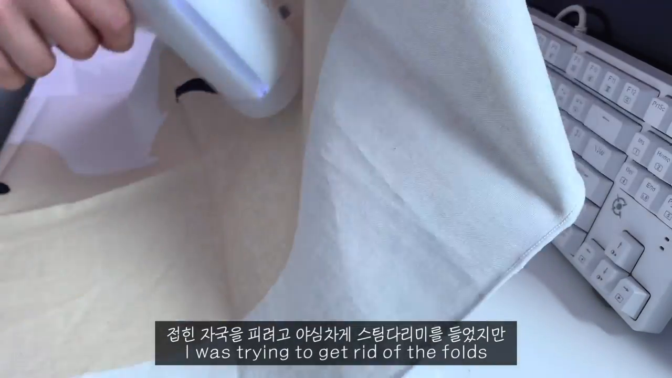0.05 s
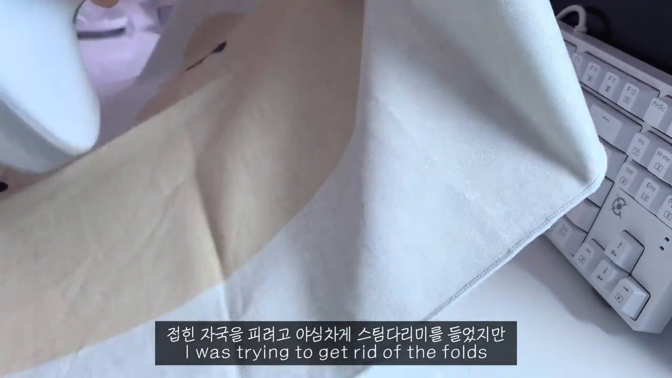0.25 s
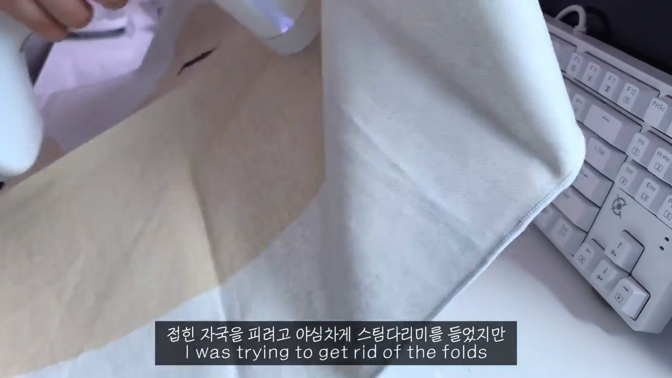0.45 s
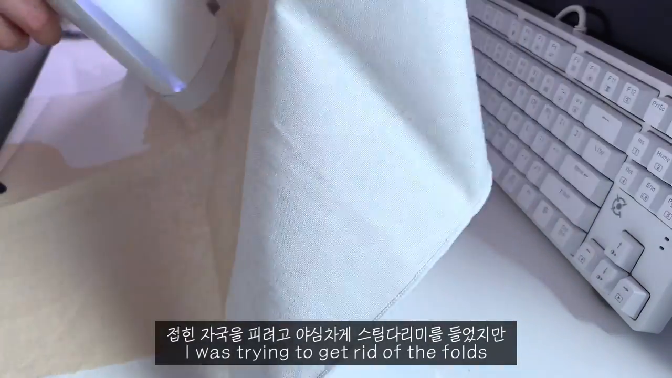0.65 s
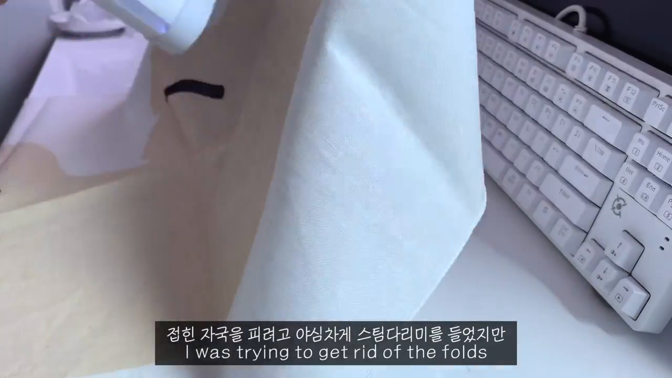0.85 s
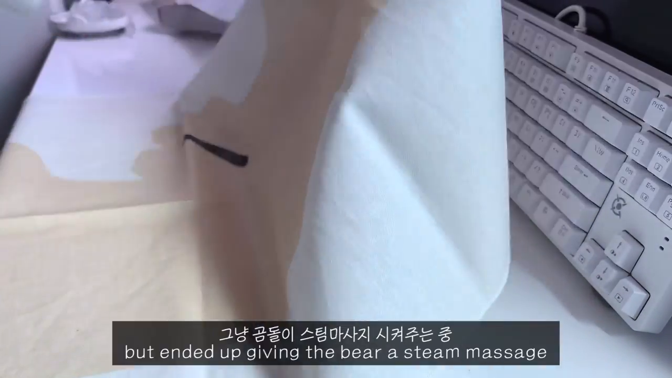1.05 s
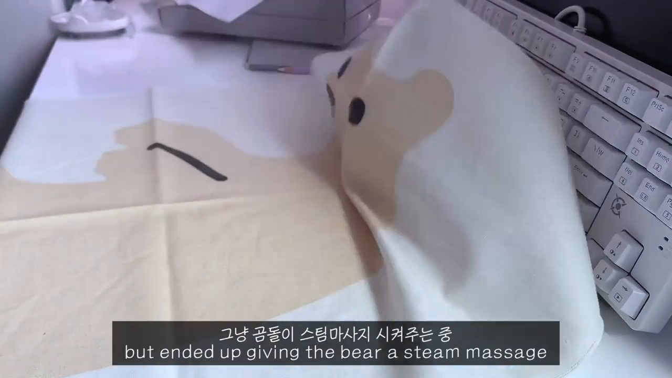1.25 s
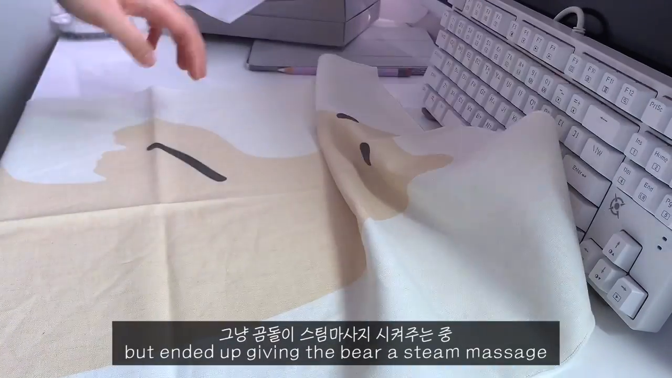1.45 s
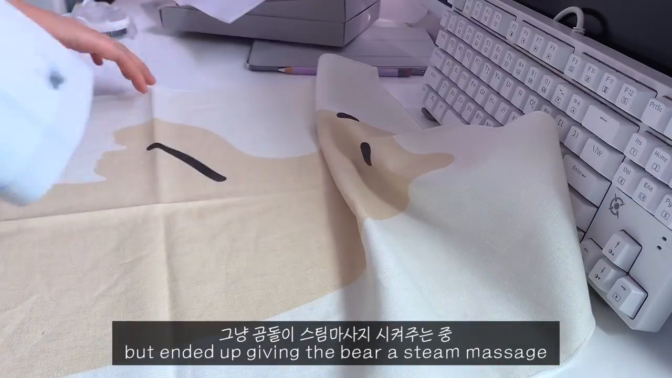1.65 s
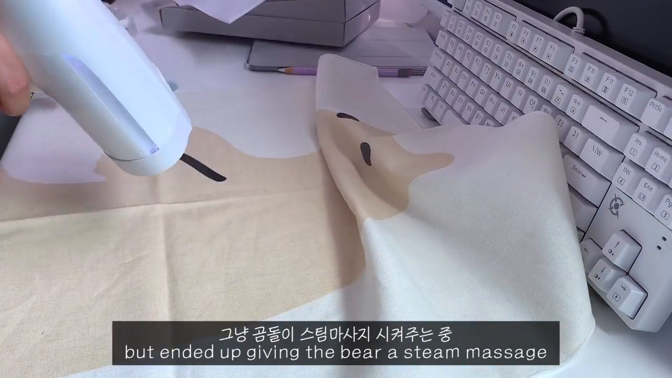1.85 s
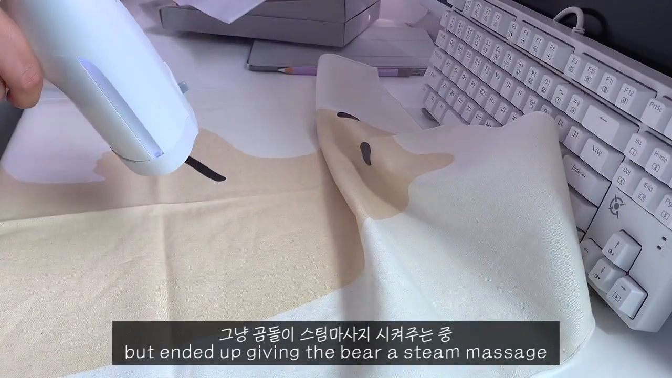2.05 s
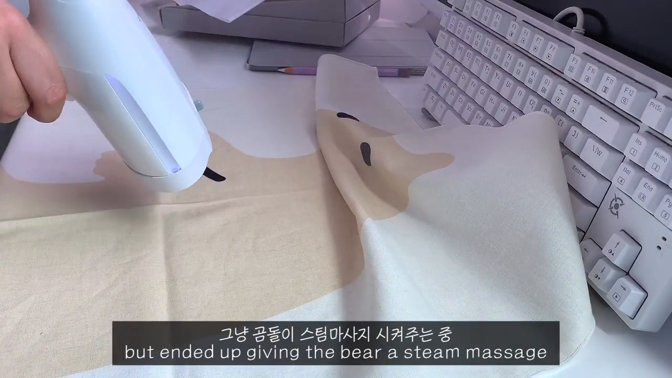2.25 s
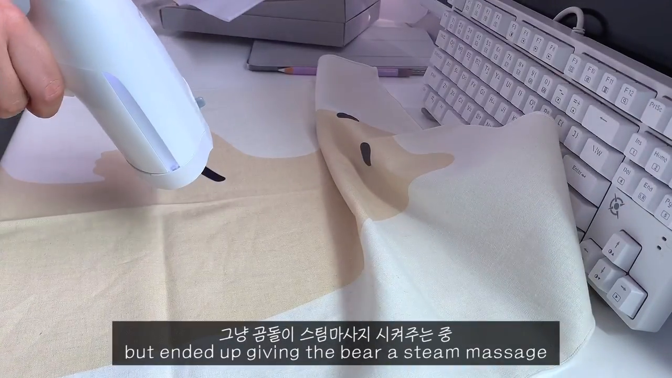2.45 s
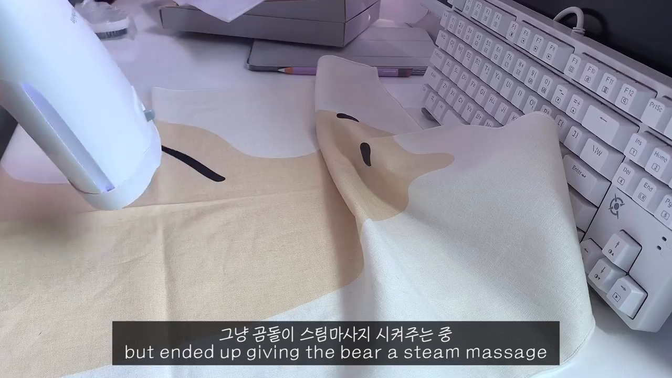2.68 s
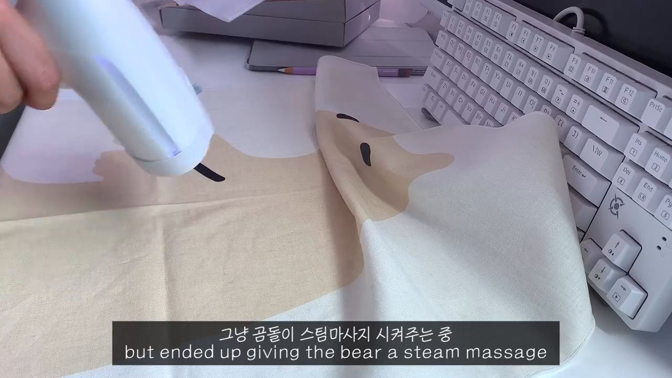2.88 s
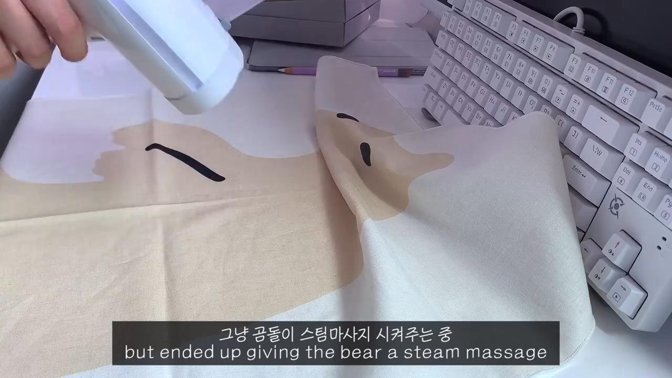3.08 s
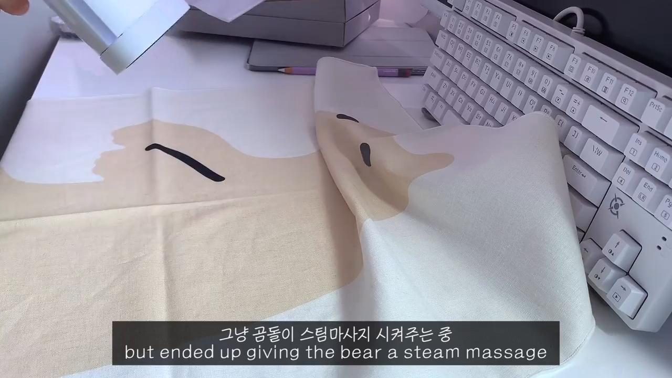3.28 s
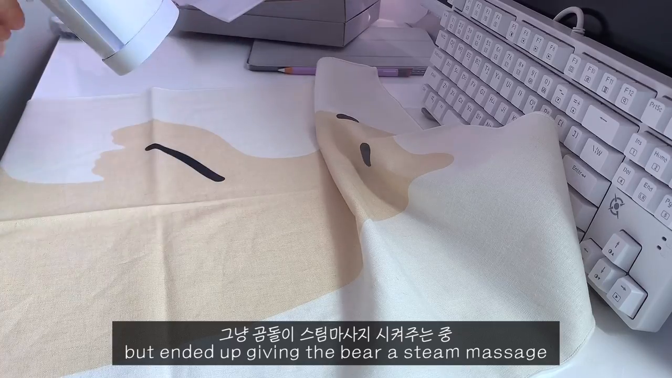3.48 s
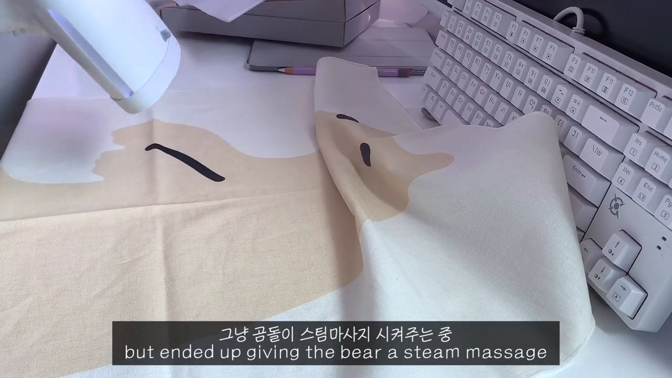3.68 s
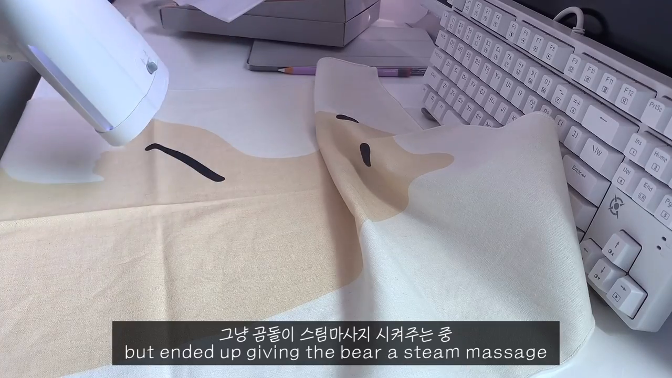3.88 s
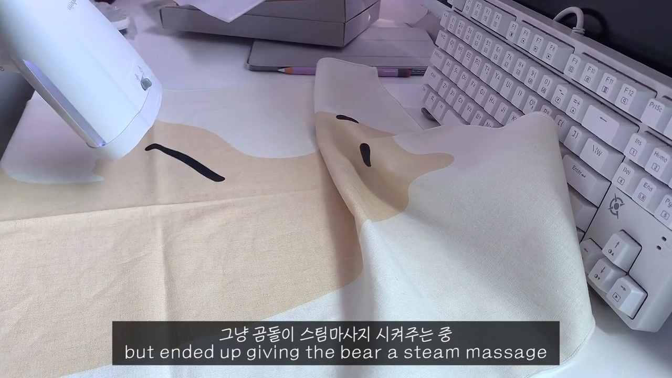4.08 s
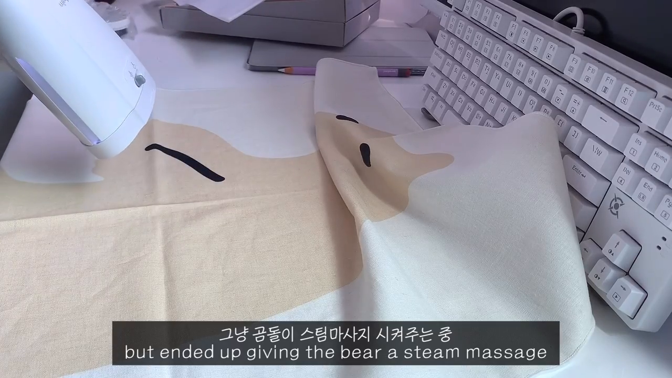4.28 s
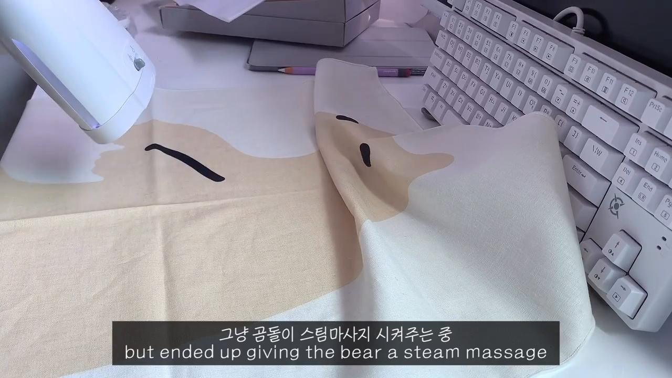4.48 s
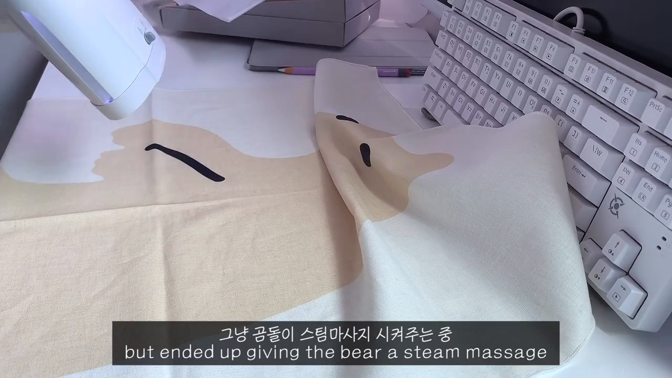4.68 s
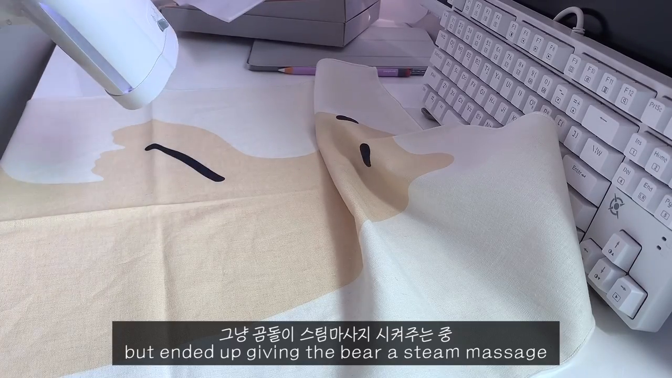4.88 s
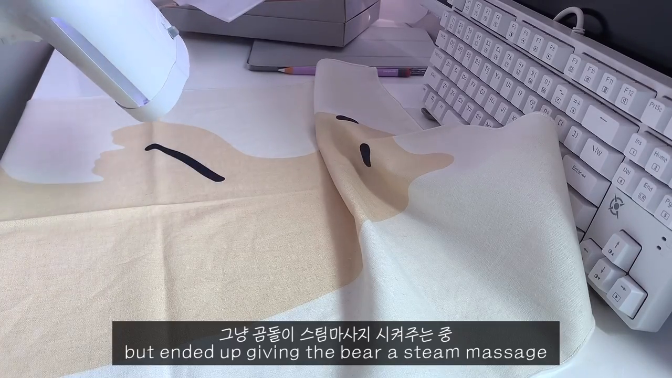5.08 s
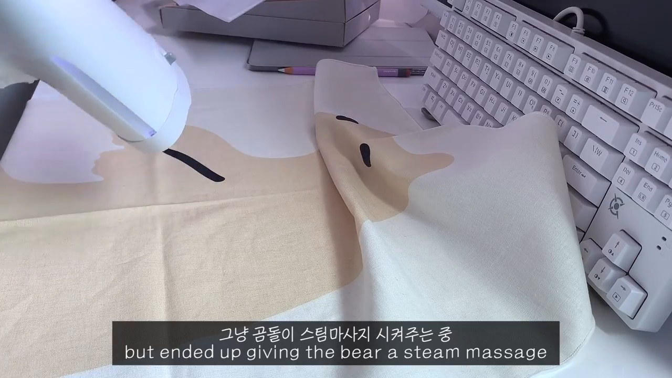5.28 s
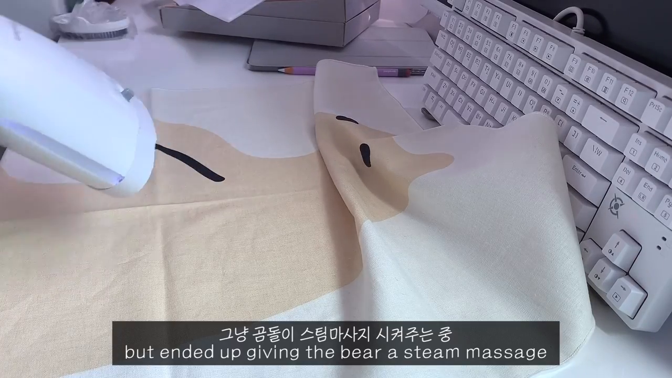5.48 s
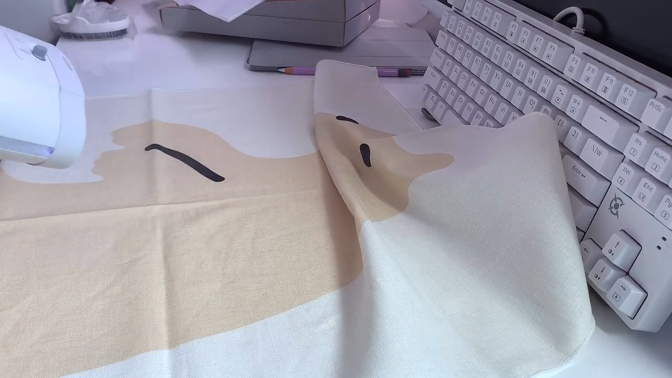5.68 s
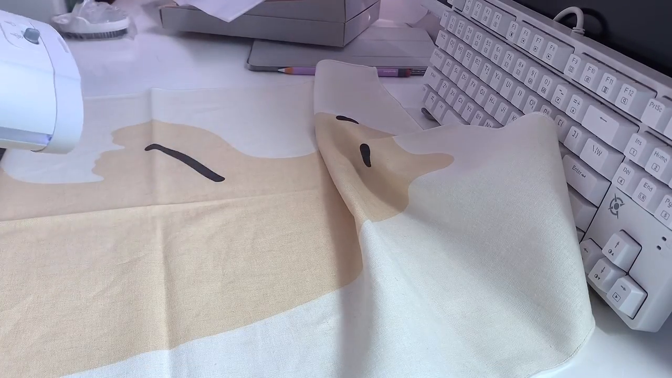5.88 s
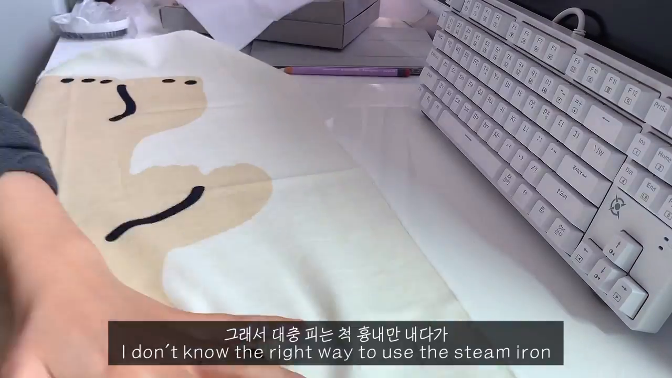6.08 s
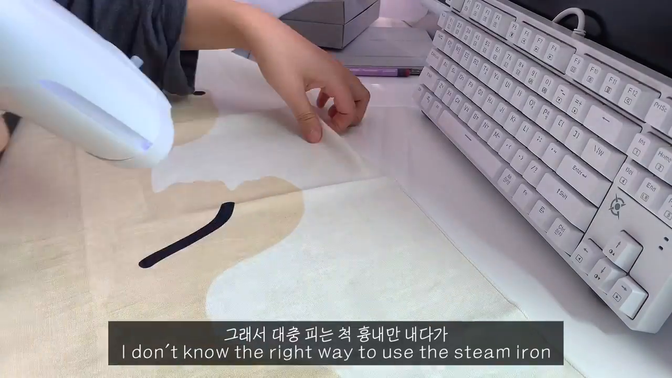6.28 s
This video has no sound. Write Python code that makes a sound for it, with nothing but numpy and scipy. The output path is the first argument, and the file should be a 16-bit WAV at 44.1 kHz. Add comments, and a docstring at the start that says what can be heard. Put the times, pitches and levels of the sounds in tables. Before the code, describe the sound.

Close up at a desk, a handheld steamer simmers and spits over a low wavering hum. A thin hiss swells, then a bright steam jet opens and blows on cloth, rising and falling with a moving, hollow comb-like colour. It stops dead near the end, leaving quiet room air and soft finger taps. Close stereo microphones, small room.

```python
"""Simmering, spitting water and a wavering hum come first, then a thin hiss swells and a steam jet opens. It is
a handheld garment steamer, worked over a cloth on a desk close to a pair of microphones. The jet is coloured
noise, combed by moving echoes off the desk; the same combs shape a softer rush on the cloth. Boiling is low
noise, the pump a few harmonics over a drone, and spits, bumps and taps are damped modes. The scene then changes
at once to the quiet room and a hand tapping the cloth."""
import sys
import numpy as np
from scipy import signal
from scipy.fft import rfft, irfft
from scipy.io import wavfile
from scipy.ndimage import uniform_filter1d

SR = 44100
rng = np.random.default_rng(int(sys.argv[2]) if len(sys.argv) > 2 else 0)


def wav_out(sig):
    """Save sig, one row per channel (or a flat mono array), as 16-bit PCM at SR to the path in sys.argv[1]."""
    wavfile.write(sys.argv[1], SR, np.round(np.clip(np.atleast_2d(sig).T, -1, 1) * 32767).astype(np.int16))


N = 279588
TIME = np.arange(N) / SR
OPEN_S, CUT_S = 0.849, 6.049  # the jet opens; the scene changes to the quiet room

# steam jet: start_s, level_db, lower_hiss_fullness_db, top_brightness_db
JET_CURVE = [(0.88, -27, -0.2, -6), (1.0, -28, -1, -4.5), (1.1, -26.5, -0.8, -2), (1.2, -27, -1, -3),
             (1.35, -25.5, -0.5, -3), (1.5, -29.5, 1.7, -4.5), (1.7, -34.5, 3, -3), (1.77, -31.3, 1.3, -5),
             (1.84, -21.5, 1, 3.5), (2.1, -21.5, 0.7, 3), (2.3, -20.5, -1.7, 0.5), (2.43, -25.4, -1, 2),
             (2.7, -26, -0.8, 1.5), (2.92, -28, -0.1, 2), (3.08, -27.5, -1.9, 2), (3.33, -24.5, -6.8, -3.5),
             (3.47, -31.1, 0.5, 0.1), (3.8, -34.5, 0.5, -2.5), (4.05, -34.3, -1, -3.6),
             (4.2, -32.5, 1.5, -2.2), (4.55, -31, 0.5, -3), (4.72, -30.5, 0.8, 0.5), (5.1, -28, 1.1, -1.3),
             (5.4, -28.5, 2, 0), (5.68, -25.5, 1, 3.5), (6.04, -24.5, 0, 0)]
# nozzle position, as echoes before each surface's colour:
# start_s, desk_delay_ms, desk_strength (0-1), far_delay_ms, far_strength (0-1)
NOZZLE_PATH = [(0.86, 0.481, 0.24, 0.412, 0.22), (0.93, 0.589, 0.11, 0.39, 0.34),
               (1.0, 0.658, 0.16, 0.391, 0.36), (1.12, 0.754, 0.18, 0.489, 0.1),
               (1.27, 0.788, 0.24, 0.627, 0.12), (1.4, 0.737, 0.22, 0.727, 0.05),
               (1.5, 0.682, 0.17, 0.772, 0.08), (1.6, 0.531, 0.07, 0.796, 0.32),
               (1.72, 0.322, 0.15, 0.716, 0.34), (1.83, 0.201, 0.22, 0.69, 0.32),
               (2.15, 0.175, 0.16, 0.685, 0.22), (2.4, 0.149, 0.08, 0.757, 0.08),
               (2.6, 0.18, 0.24, 0.75, 0.05), (2.78, 0.182, 0.18, 0.78, 0.4),
               (2.95, 0.182, 0.15, 0.648, 0.06), (3.05, 0.235, 0.19, 0.539, 0.1),
               (3.15, 0.336, 0.1, 0.494, 0.38), (3.3, 0.4, 0.16, 0.524, 0.48),
               (3.45, 0.345, 0.13, 0.547, 0.4), (3.6, 0.283, 0.16, 0.559, 0.13),
               (3.8, 0.175, 0.17, 0.663, 0.19), (4.0, 0.14, 0.14, 0.726, 0.12),
               (4.3, 0.129, 0.22, 0.735, 0.14), (4.55, 0.18, 0.15, 0.805, 0.108),
               (4.8, 0.24, 0.18, 0.77, 0.126), (5.1, 0.252, 0.21, 0.758, 0.18),
               (5.35, 0.218, 0.19, 0.784, 0.162), (5.52, 0.189, 0.2, 0.849, 0.099),
               (5.68, 0.294, 0.1, 0.838, 0.18), (5.85, 0.395, 0.08, 1.074, 0.22),
               (6.05, 0.334, 0.1, 1.034, 0.29)]
# rumble of boiling water, before the trim in boil(): start_s, level_db
BOIL_CURVE = [(0.4, -51), (0.8, -49), (1.1, -50.5), (1.5, -52.5), (1.72, -44.5), (1.95, -56), (2.3, -51),
              (2.55, -57.5), (3.75, -56), (4.2, -54), (5.7, -52.5), (5.9, -54.5)]
# pump hum, before waver, throb and lean: start_s, pitch_hz, fundamental_db, second_harmonic_db
PUMP_CURVE = [(0, 70, -53, -45.5), (0.55, 76.9, -52.5, -52.5), (1.0, 78.06, -49.5, -52),
              (1.2, 77, -66, -59), (2.3, 63.85, -51, -90), (2.8, 66, -57, -53), (3.25, 69, -55, -56),
              (3.7, 81.9, -59.5, -63.5), (4.2, 93, -54, -64), (4.85, 64, -63, -57), (5.05, 65, -57, -54),
              (5.45, 66.05, -51.5, -52.5), (5.75, 72.9, -78, -49.5), (6.05, 73.9, -59, -56.5)]
# drone of the housing, before throb and lean: start_s, pitch_hz, level_db
DRONE_CURVE = [(0, 56.3, -81), (1.1, 50.2, -65), (1.5, 48.2, -45), (1.7, 49.3, -46), (1.9, 47.7, -69),
               (2.6, 51.6, -53), (3.1, 49.2, -70), (4.1, 51.7, -50.5), (4.7, 55.4, -53.5),
               (6.05, 58.97, -50)]

# spectrum of the jet's hiss: frequency_hz, density_db (relative, per Hz)
JET_COLOUR = [(600, -38), (1400, -23), (2100, -18.5), (2700, -14.5), (3400, -10.8), (4200, -11.5),
              (4900, -13), (5500, -11.7), (6200, -8), (7000, -3.3), (8200, 0), (9100, -2.9), (9600, -2.5),
              (10900, -6.8), (12200, -7.5), (13800, -5), (15700, -6)]
# spectrum of steam rushing against cloth: frequency_hz, density_db (relative, per Hz)
BUFFET_COLOUR = [(100, -4), (300, 0), (480, -0.5), (700, 5.5), (1000, 3.5), (1500, 3.5), (2200, -2),
                 (3500, -5), (6000, -24), (12000, -46)]
# spectrum of the thin escaping hiss: frequency_hz, density_db (relative, per Hz)
LEAK_COLOUR = [(1500, -48), (3500, -6), (5400, -14), (6300, -5), (7000, 0.5), (8300, -1.5), (9800, -13),
               (15500, -22)]
# spectrum of the boil: frequency_hz, density_db (relative, per Hz)
BOIL_COLOUR = [(20, -26), (35, -25), (55, 6), (80, -5.5), (110, 0), (160, 1.5), (260, -0.5), (380, -9),
               (600, -9.5), (1500, -48)]
# spectrum of the room air: frequency_hz, density_db (relative, per Hz)
ROOM_COLOUR = [(35, -88), (60, -52), (212, -18), (294, -2), (566, -14.5), (651, -6), (1100, -13),
               (1600, -18.5), (2500, -25.5), (5090, -24.5), (8510, -30), (11000, -32), (16000, -39)]
ROOM_DB = -48.5

# phase between the two microphones: frequency_hz, left_lead_rad
MIC_PHASE = [(0, 0), (160, -.25), (500, .9), (1000, 1.5), (1500, 1.7), (2100, 2.4), (2650, 3.1),
             (3400, 3.5), (4800, 5.7), (5700, 4.8), (6700, 4.3), (7300, 2.9), (9000, .1), (9900, -.4),
             (11400, -3.1), (12100, -3.4), (13700, -6.2), (14500, -6.5), (15900, -9.5)]
# how alike the microphones hear a sound, before spread and direct sound: frequency_hz, likeness (0-1)
MIC_LIKENESS = [(60, .99), (200, .92), (400, .78), (1200, .55), (2000, .68), (2450, .85), (2750, .9),
                (3300, .82), (4500, .55), (6800, .62), (7800, .84), (9300, .93), (10400, .78), (10900, .88),
                (11250, .99), (12000, .99), (12400, .87), (12800, .8), (14000, .94), (15300, .75)]
# level balance of the microphones: frequency_hz, left_over_right_db
MIC_BALANCE = [(130, -5), (400, -0.5), (1100, 5.5), (1800, -1.5), (3600, 1.5), (5800, -3.5), (7100, 1),
               (8000, -0.5)]

# water spitting in the boiler, before left-right lean: start_s, peak_db
SPITS = [(0.065, -44), (0.08, -40), (0.226, -42), (0.32, -39), (0.497, -40), (0.589, -39), (0.615, -34),
         (0.631, -42), (0.653, -41), (0.715, -37), (0.728, -37), (0.802, -39.5), (0.841, -38), (0.854, -36)]
# ringing of spits and bubbles, before detuning: pitch_hz, level_db (relative), t60_s
SPIT_MODES = [(400, -2, 0.014), (640, 1, 0.012), (860, -0.5, 0.0045), (1190, -9, 0.0092),
              (1880, -12, 0.0059)]
# the body bumped in the hand, before left-right lean: start_s, peak_db
BUMPS = [(5.071, -33.5), (5.1, -36)]
# ringing of the bumped body, before detuning: pitch_hz, level_db (relative), t60_s
BUMP_MODES = [(75.9, -27, 0.074), (126, 7, 0.065), (230, 2, 0.033)]
# fingers tapping cloth and desk, before lean and low cut: start_s, peak_db
TAPS = [(6.229, -32), (6.307, -44), (6.311, -41)]
# ringing of the taps, before detuning: pitch_hz, level_db (relative), t60_s
TAP_MODES = [(800, 0, .016), (1140, 2, .012), (1620, 2, 0.011), (2680, -1, .006), (3670, -3, 0.005),
             (5200, -10, .004)]

# cloth on the desk, reflecting the lower hiss best: frequency_hz, factor_on_strength (ratio)
DESK_REFLECTS = [(1500, 1.9), (4000, 2.4), (8500, 1), (14000, 1.3)]
# small things further away, reflecting mostly treble: frequency_hz, factor_on_strength (ratio)
FAR_REFLECTS = [(4000, .2), (8500, 1), (14000, .9)]

DESK_LEAD_RAD, FAR_LEAD_RAD = 0.84, 0.24  # phase lead of each echo
DIFFUSE = 0.08  # diffuse power beside the direct sound (share)
GLIDE_S = 0.04  # smoothing of the hand's movement
# desk delays over which the head comes clear of the cloth
LIFT_FROM_MS, LIFT_SPAN_MS = 0.14, 0.21
# desk delays over which the lower hiss grows more diffuse, and how far (0-1)
CLEAR_FROM_MS, CLEAR_SPAN_MS, CLEAR_SPREAD = 0.47, 0.27, 1
EDGE_HZ = 15800  # top of the final band limit


def jet(level_db=0, flutter_db=0.38, sputter_db=0.06, patchy_db=2.7):
    """Turbulent hiss from the nozzle, combed by echoes and roughened by droplets."""
    t, hz = grid(size=1024)
    _, full_db, bright_db = follow(JET_CURVE, t)
    # the cloth in front of the nozzle shifts weight between the lower hiss and the top
    cloth_db = full_db * read([(5500, 1), (7500, 0)], hz)
    cloth_db = cloth_db + bright_db * read([(8800, 0), (11500, 1)], hz)
    comb_db = nozzle_comb_db(t, hz)
    # eddies of steam make the hiss patchy in time and frequency
    eddies = rng.standard_normal(cloth_db.shape)
    eddies = uniform_filter1d(eddies, size=9, axis=0)
    eddies = uniform_filter1d(eddies, size=6, axis=1)
    field_db = cloth_db + comb_db + clutter_db(t, hz) + patchy_db * evened(eddies)
    # lifted high, the lower hiss reaches the microphones more diffusely
    desk_ms = nozzle(t)[0]
    clear = np.clip((desk_ms - CLEAR_FROM_MS) / CLEAR_SPAN_MS, 0, 1)
    clear = clear * read([(6000, 1), (8000, 0)], hz)
    hiss = mic_noise(JET_COLOUR, size=1024, field_db=field_db, spread=CLEAR_SPREAD * clear, direct_db=comb_db)
    hiss /= np.std(band(hiss, 7000, 10500))
    valve = np.clip((TIME - OPEN_S) / 0.061, 0, 1)  # opens over 61 ms
    jet_db = level_db + follow(JET_CURVE, TIME)[0]
    jet_db = jet_db + flutter_db * wander(10) + sputter_db * wander(380)
    return hiss * valve * gain_of(jet_db)


def nozzle_comb_db(t, hz):
    """The direct sound and its two strong echoes interfere; diffuse sound fills the notches a little."""
    desk_ms, desk_strength, far_ms, far_strength = nozzle(t)
    radians_per_ms = 2 * np.pi * hz / 1000
    desk_turn = np.exp(1j * (DESK_LEAD_RAD - radians_per_ms * desk_ms))
    far_turn = np.exp(1j * (FAR_LEAD_RAD - radians_per_ms * far_ms))
    desk = desk_strength * read(DESK_REFLECTS, hz) * desk_turn
    far = far_strength * read(FAR_REFLECTS, hz) * far_turn
    return 10 * np.log10(DIFFUSE + abs(1 + desk + far) ** 2)


def clutter_db(t, hz):
    """Keyboard, boxes and walls add many faint echoes, whose paths change as the nozzle moves."""
    desk_ms, _, far_ms, _ = nozzle(t)
    field_db = 0
    for base_ms in np.geomspace(1.2, 10, 22):
        with_lift, with_reach = rng.uniform(0.4, 1.1, 2)
        # the hand is never quite still, and the cloud of steam bends each path
        tremor_ms = 0.035 * np.interp(t, TIME, wander(3))
        path_ms = base_ms + with_lift * desk_ms + with_reach * (far_ms - far_ms.mean()) + tremor_ms
        field_db = field_db + echo_db(hz, path_ms, 0.08)
    return field_db


def echo_db(hz, delay_ms, strength):
    """The comb that one short echo lays on a sound by adding and cancelling."""
    ripple = 2 * strength / (1 + strength ** 2)
    power = 1 + ripple * np.cos(2 * np.pi * hz * delay_ms / 1000)
    return 10 * np.log10(1e-3 + abs(power))


def nozzle(t):
    """The nozzle's echo delays and strengths at the times t, gliding smoothly with the hand."""
    glide = int(GLIDE_S * SR)
    columns = follow(NOZZLE_PATH, TIME)
    return [np.interp(t, TIME, uniform_filter1d(column, glide, mode="nearest")) for column in columns]


def lift(t):
    """How far the head is clear of the cloth (0-1), taken from the desk echo's delay."""
    return np.clip((follow(NOZZLE_PATH, t)[0] - LIFT_FROM_MS) / LIFT_SPAN_MS, 0, 1)


def buffet(idle_db=-63, blowing_db=-52, follows_jet=0.63, follows_boil=0.94, lifted_db=-3, flutter_db=1.18):
    """The soft rush of steam against the cloth grows with the jet and the boil, and eases as the head lifts."""
    t, hz = grid(size=1024)
    comb_db = nozzle_comb_db(t, hz) * (t > OPEN_S)
    rush = mic_noise(BUFFET_COLOUR, size=1024, field_db=comb_db, spread=0.4 * (t < OPEN_S), direct_db=comb_db)
    rush = unit_in(rush, 500, 1800)
    jet_db, boil_db = follow(JET_CURVE, TIME)[0], follow(BOIL_CURVE, TIME)[0]
    blown_db = blowing_db + follows_jet * (jet_db - jet_db.mean()) + lifted_db * lift(TIME)
    level_db = np.where(TIME < OPEN_S, idle_db, blown_db)
    level_db = level_db + follows_boil * (boil_db - boil_db.mean())
    return rush * gain_of(level_db + flutter_db * wander(23))


def leak(idle_db=-72.5, swell_s=0.61, swell_db=20.5, rise_s=0.089, flutter_db=1.5):
    """A thin hiss escapes, and swells as pressure builds just before the jet opens."""
    hiss = unit_in(mic_noise(LEAK_COLOUR, size=512, spread=0.4), 6000, 9000)
    pressure = 1 - np.exp(-np.maximum(TIME - swell_s, 0) / rise_s)
    sounding = TIME < OPEN_S + 0.02
    return hiss * sounding * gain_of(idle_db + swell_db * pressure + flutter_db * wander(40))


def simmer(per_s=220, idle_db=-57, swell_s=0.38, swell_db=6):
    """Many tiny bubbles burst in the boiler, harder as pressure builds before the jet opens."""
    bursts = rng.random(N) < per_s / SR
    size = gain_of(2.5 * np.minimum(rng.exponential(1, N), 3)) * bursts
    pressure = np.clip((TIME - swell_s) / (OPEN_S - swell_s), 0, 1)
    size = size * gain_of(swell_db * pressure) * (TIME < OPEN_S + 0.02)
    pop = knocks([(0.0018, idle_db)], SPIT_MODES)[:, :SR // 20]
    return signal.oaconvolve(size[None], pop, axes=1)[:, :N]


def knocks(rows, modes, scatter=0.39, lean_db=0, attack_s=0.00071):
    """Each blow rings the same few damped modes, a little differently every time."""
    mode_hz, mode_db, t60_s = np.transpose(modes)[:, :, None]
    t, out = np.arange(SR // 8) / SR, np.zeros(N)
    detunes = rng.standard_normal((len(rows), len(modes), 1))
    for (start_s, peak_db), detune in zip(rows, detunes):
        decay = np.exp(-np.log(1000) * t / t60_s)
        tone = np.sin(2 * np.pi * mode_hz * (1 + scatter * detune) * t)  # scatter is a share of the pitch
        ring = (gain_of(mode_db) * decay * tone).sum(0)
        ring *= 1 - np.exp(-t / attack_s)
        part = out[round(start_s * SR):][:len(t)]
        part += (gain_of(peak_db) * ring / abs(ring).max())[:len(part)]
    return out * gain_of([[lean_db], [-lean_db]])  # left, right


def boil(level_db=-2, lumpy_db=2):
    """Lumpy rumble of the water in the boiler: low noise whose level wanders."""
    rumble = unit_in(mic_noise(BOIL_COLOUR, size=4096), 85, 350)
    return rumble * gain_of(level_db + follow(BOIL_CURVE, TIME)[0] + lumpy_db * wander(19))


def pump(third_db=-8, fourth_db=-12, lean_db=1.4):
    """A wavering hum of four harmonics above a deeper drone; third and fourth sit below the second."""
    waver, throb_db = 0.012, 1.6  # rms share of the pitch, rms level
    pitch_hz, first_db, second_db = follow(PUMP_CURVE, TIME)
    angle = 2 * np.pi * np.cumsum(pitch_hz * (1 + waver * wander(8.2))) / SR
    levels = [first_db, second_db, second_db + third_db, second_db + fourth_db]
    hum = 0
    for k, db in enumerate(levels, 1):
        throb = gain_of(db + throb_db * wander(4.4))
        hum = hum + throb * np.sin(k * angle + 2 * np.pi * rng.random())
    drone_hz, drone_db = follow(DRONE_CURVE, TIME)
    drone_angle = 2 * np.pi * np.cumsum(drone_hz) / SR
    drone = gain_of(drone_db + throb_db * wander(6.2)) * np.sin(drone_angle)
    return (hum + drone) * gain_of([[-lean_db], [lean_db]])  # left, right


def room(level_db=0, width=0.51, rustle_db=1.4):
    """Quiet room air as coloured mid and side noise, with a faint rustle of cloth in its level."""
    colour = gain_of(read(ROOM_COLOUR, np.fft.rfftfreq(N, 1 / SR)))
    mid, side = irfft(rfft(rng.standard_normal((2, N))) * colour, N)
    mid, side = evened(mid), width * evened(side)
    air = np.array([mid + side, mid - side])
    return air * gain_of(ROOM_DB + level_db + rustle_db * wander(33.7))


def mic_noise(colour, size, field_db=0, spread=0, direct_db=0):
    """Noise of a given colour as two microphones hear it: partly alike, shifted in phase and level."""
    t, hz = grid(size)
    shape = (2, len(t), len(hz))
    near, other = rng.standard_normal(shape) + 1j * rng.standard_normal(shape)
    same = np.clip(read(MIC_LIKENESS, hz) * (1 - spread), 0, 1)
    lean = gain_of(read(MIC_BALANCE, hz) / 2)
    # where the direct sound stands out from the diffuse, the two microphones hear more alike
    same = same / (same + (1 - same) * gain_of(-direct_db) ** 2)
    right = same * near + np.sqrt(1 - same ** 2) * other
    right = right * np.exp(-1j * read(MIC_PHASE, hz))
    spectra = np.array([near * lean, right / lean]) * gain_of(read(colour, hz) + field_db)
    overlap = size - size // 4
    return signal.istft(spectra, nperseg=size, noverlap=overlap, time_axis=1, freq_axis=2)[1][:, :N]


def grid(size):
    """Times (a column) and frequencies (a row) of short-time spectra, a quarter frame apart."""
    hop = size // 4
    return np.arange(N // hop + 5)[:, None] * hop / SR, np.fft.rfftfreq(size, 1 / SR)


def wander(rate_hz):
    """Slow chance of unit rms, fading above about the given rate."""
    hz = np.fft.rfftfreq(N, 1 / SR)
    slow = (hz > 1) / (1 + (hz / rate_hz) ** 2)
    return evened(irfft(rfft(rng.standard_normal(N)) * slow, N))


def band(x, lo_hz, hi_hz):
    """The part of x between two frequencies."""
    hz = np.fft.rfftfreq(N, 1 / SR)
    return irfft(rfft(x) * ((hz >= lo_hz) & (hz <= hi_hz)), N)


def unit_in(x, lo_hz, hi_hz):
    """Scales a stereo sound so that its centre has unit rms in one band."""
    return x / np.std(band(x.mean(0), lo_hz, hi_hz))


def evened(x):
    """Scales to unit rms."""
    return x / np.sqrt(np.mean(x ** 2) + 1e-20)


def gain_of(db):
    """Decibels to amplitude."""
    return 10 ** (np.asarray(db) / 20)


def read(points, hz):
    """A frequency table, read on a log-frequency axis."""
    f, value = np.transpose(points)
    return np.interp(np.log(hz + 1), np.log(f + 1), value)


def follow(rows, t):
    """Every column of a curve table at the times t."""
    start_s, *columns = np.transpose(rows)
    return [np.interp(t, start_s, column) for column in columns]


def scene():
    """The steamer until the scene changes, then the room and the tapping hand."""
    steamer = jet() + buffet() + leak() + simmer() + boil() + pump()
    steamer += knocks(SPITS, SPIT_MODES, scatter=0.098, lean_db=3.0)
    steamer += knocks(BUMPS, BUMP_MODES, lean_db=-2.5)
    taps = knocks(TAPS, TAP_MODES, scatter=0.03, lean_db=-2.5, attack_s=0.0004)
    taps = signal.sosfilt(signal.butter(2, 300, "high", fs=SR, output="sos"), taps)
    return np.where(TIME < CUT_S, steamer, room() + taps)


def record(dry):
    """The recorder's low cut at 30 Hz and steep band limit in the treble."""
    dry = signal.sosfilt(signal.butter(4, 30, "high", fs=SR, output="sos"), dry)
    band_limit = signal.firwin(511, EDGE_HZ, window=("kaiser", 9), fs=SR)
    return signal.oaconvolve(dry, band_limit[None], "same")


dry = scene()
out = record(dry)
wav_out(out)
```